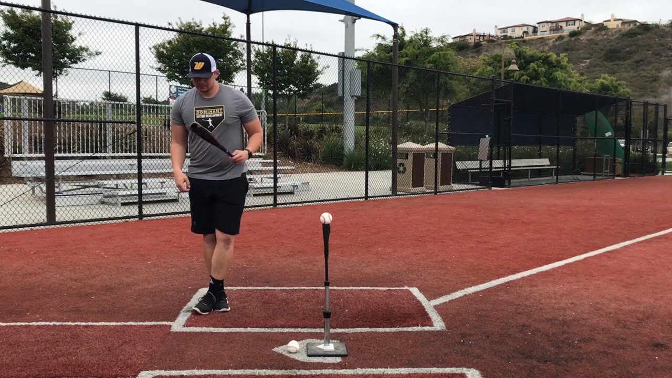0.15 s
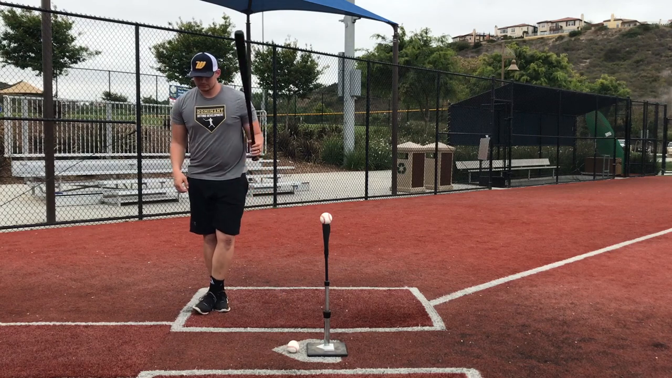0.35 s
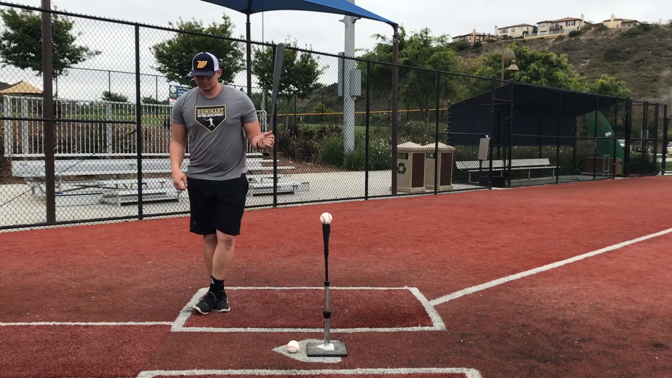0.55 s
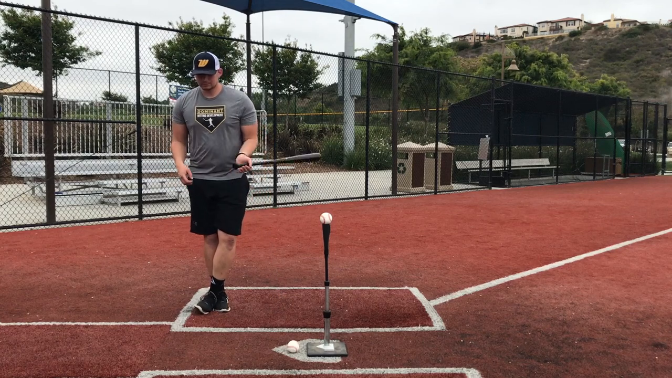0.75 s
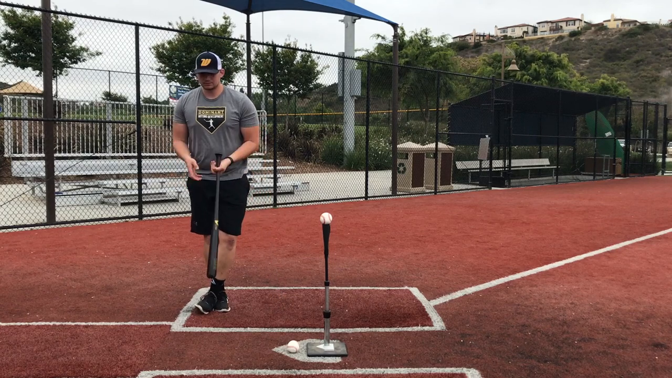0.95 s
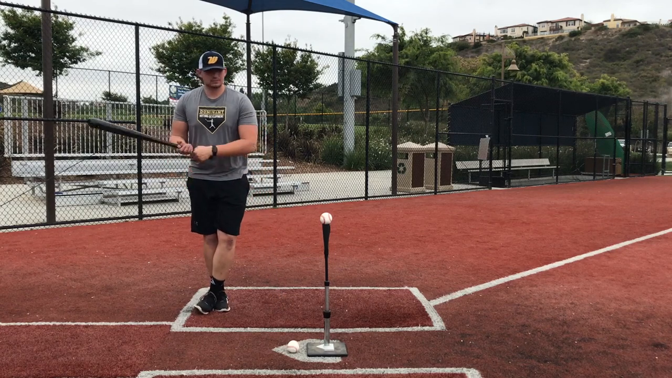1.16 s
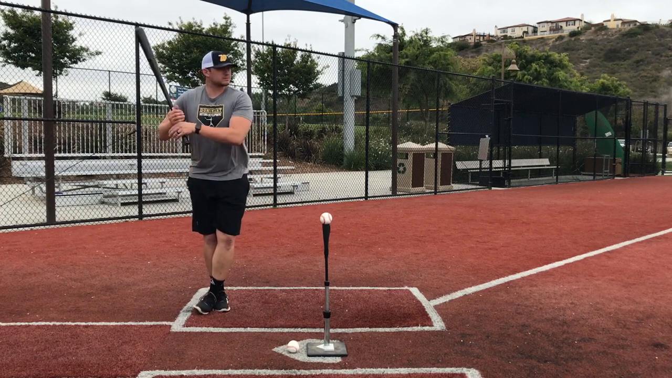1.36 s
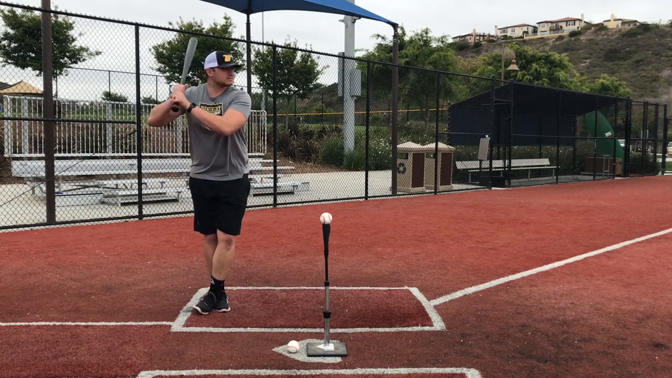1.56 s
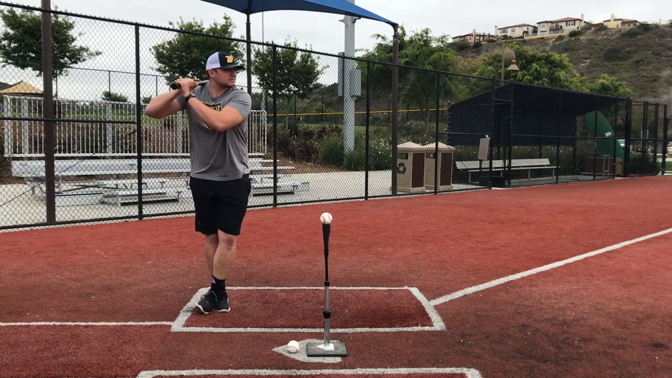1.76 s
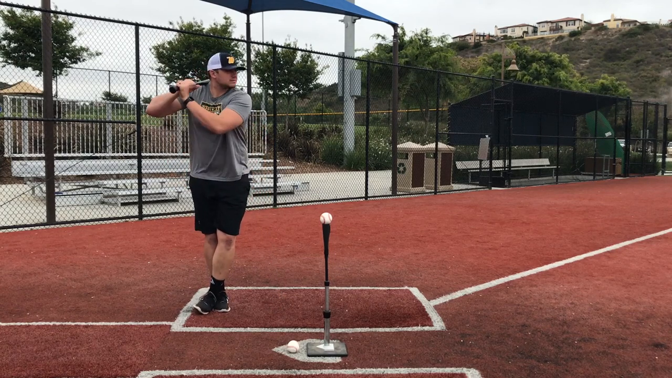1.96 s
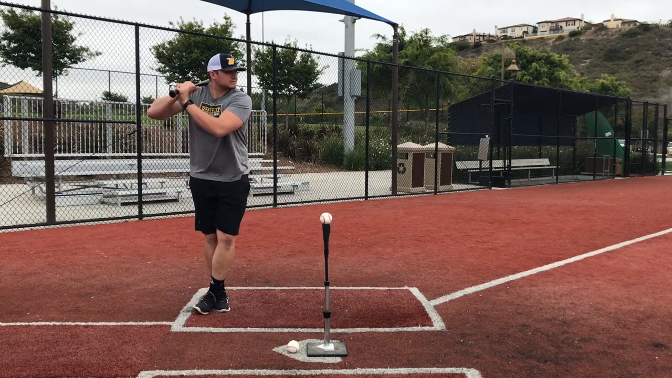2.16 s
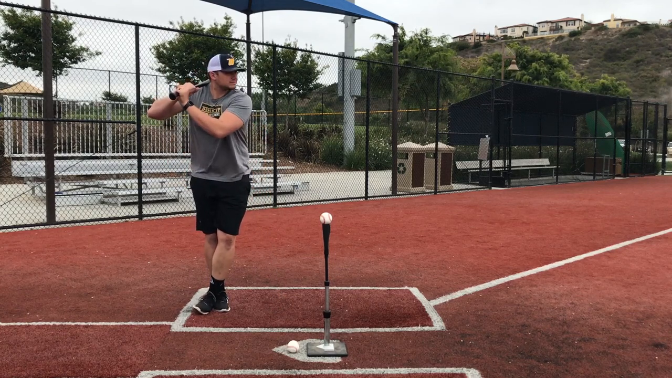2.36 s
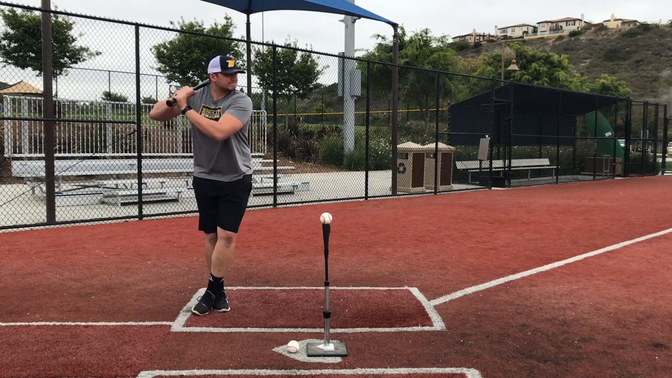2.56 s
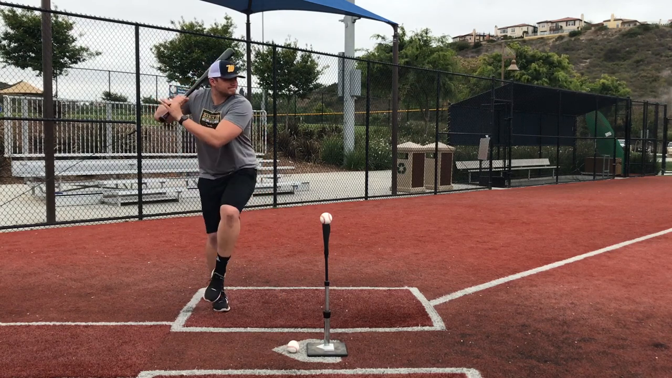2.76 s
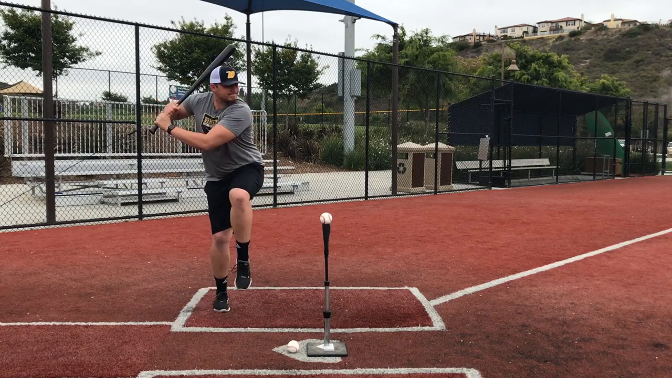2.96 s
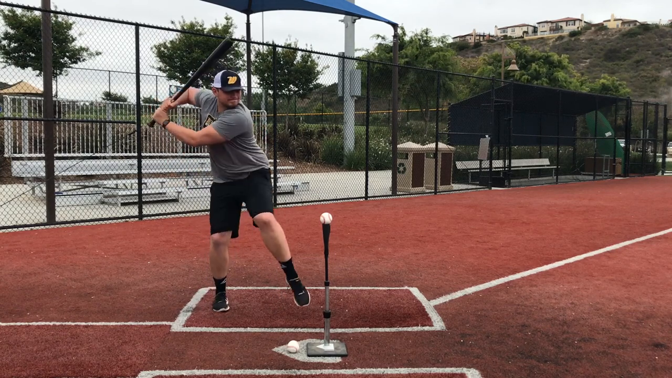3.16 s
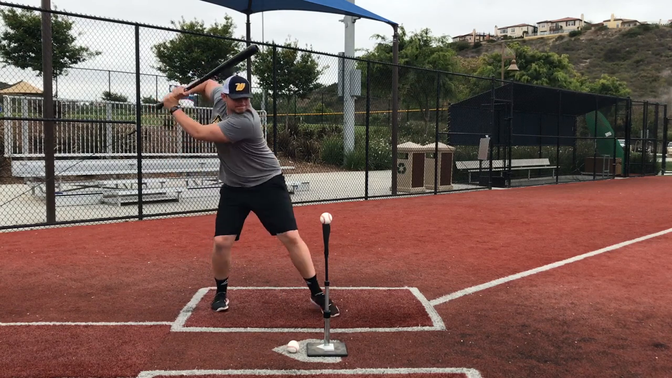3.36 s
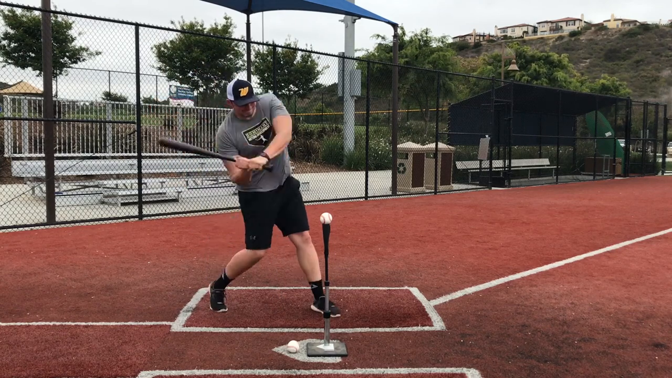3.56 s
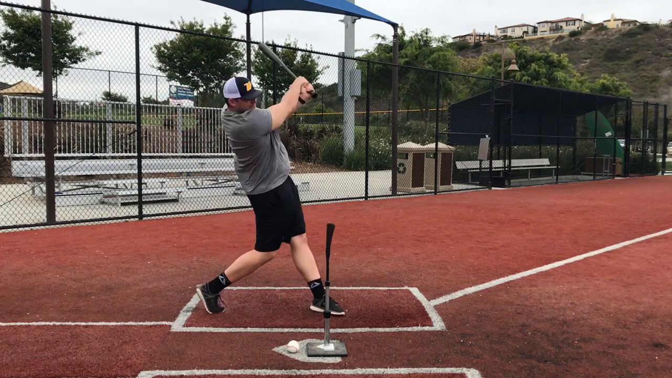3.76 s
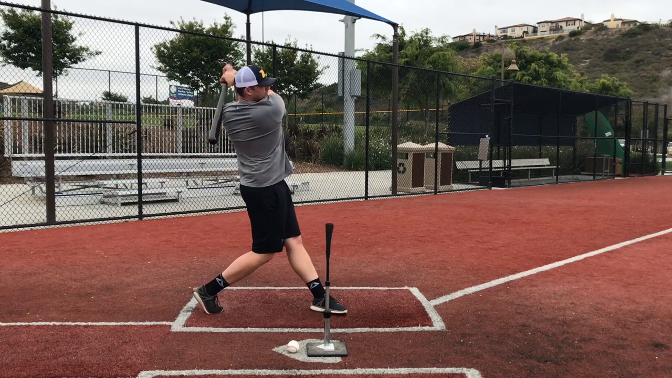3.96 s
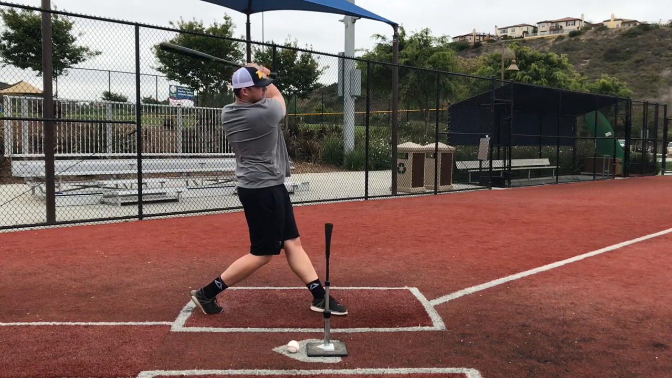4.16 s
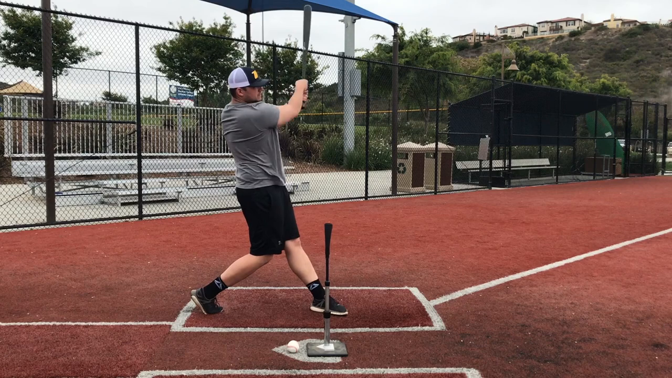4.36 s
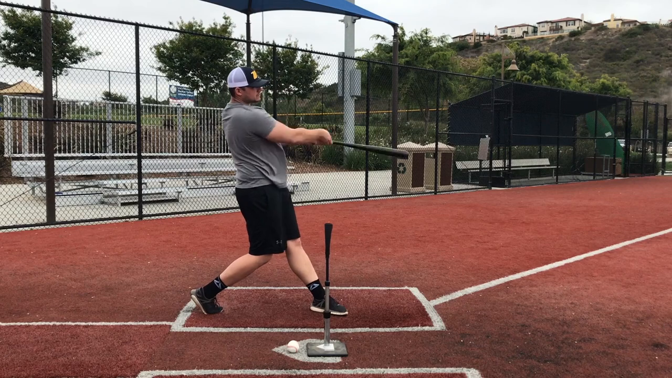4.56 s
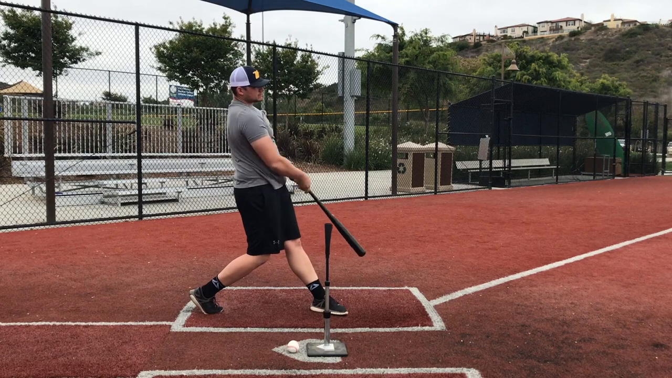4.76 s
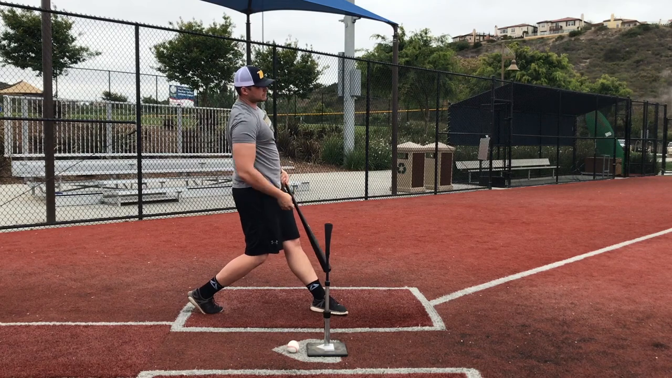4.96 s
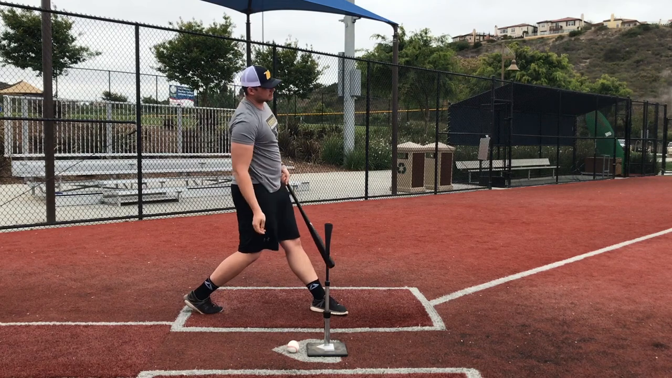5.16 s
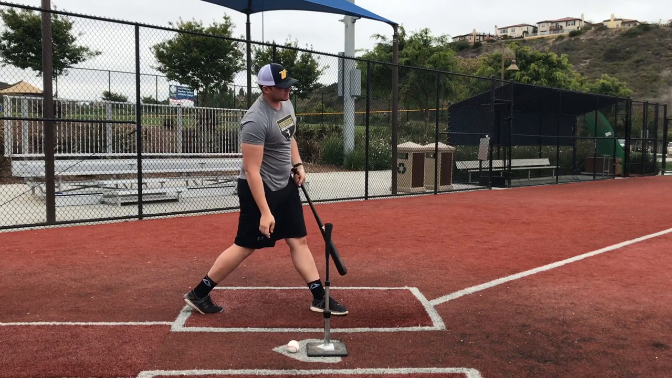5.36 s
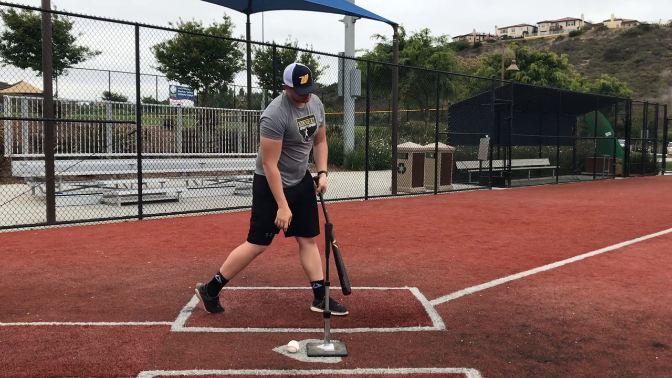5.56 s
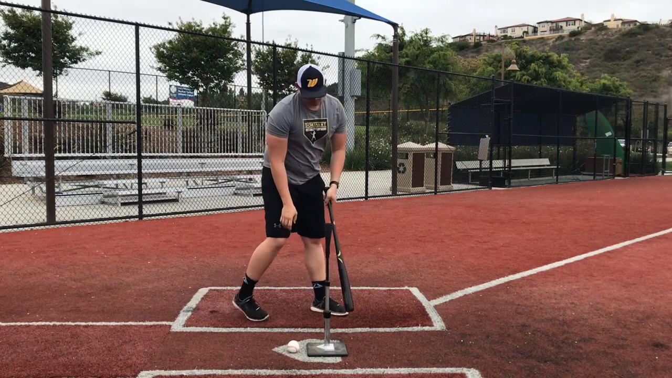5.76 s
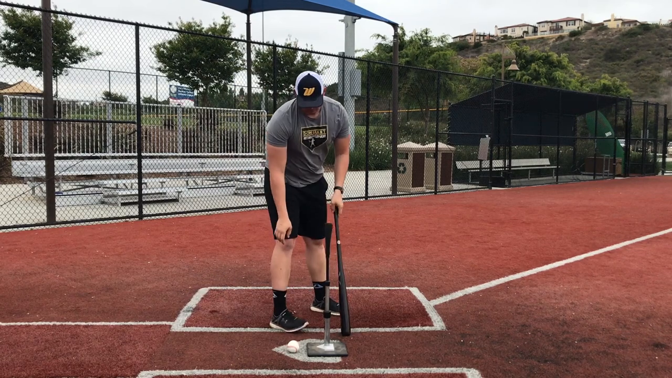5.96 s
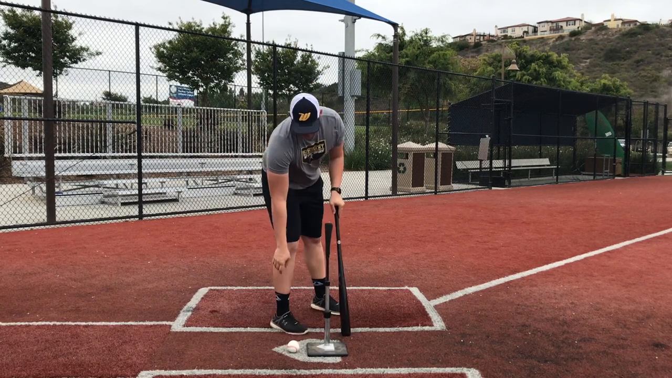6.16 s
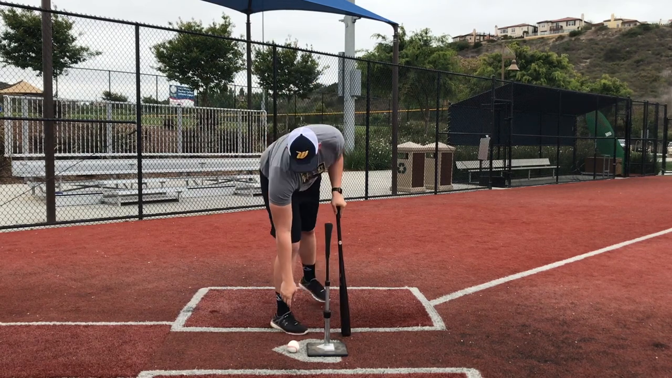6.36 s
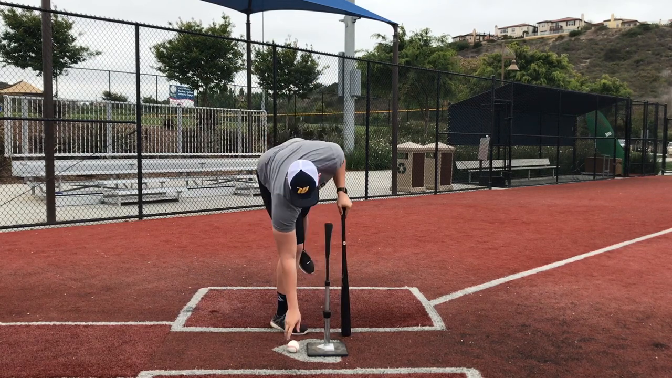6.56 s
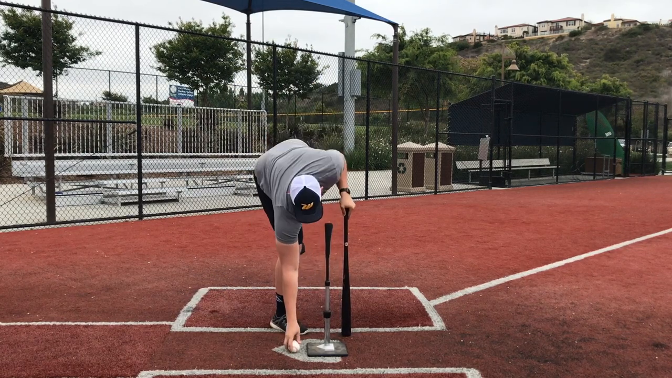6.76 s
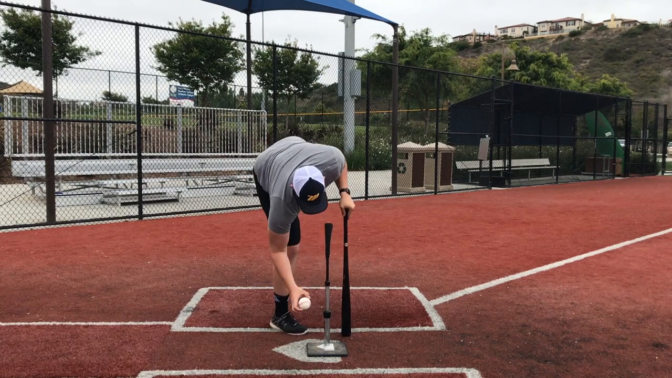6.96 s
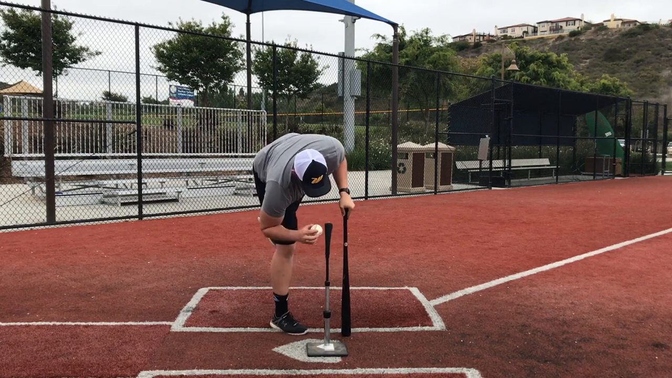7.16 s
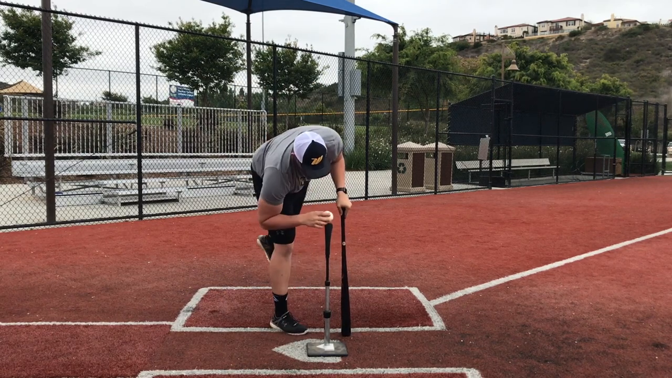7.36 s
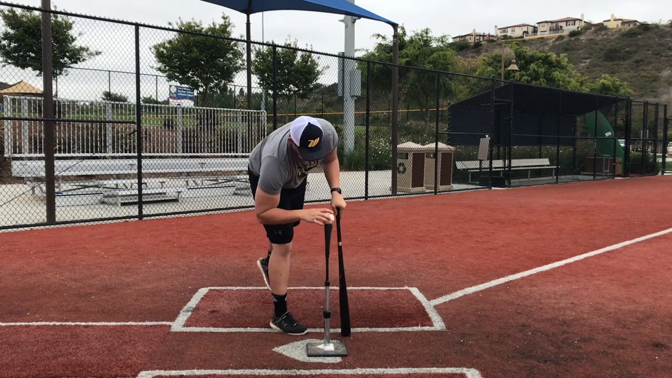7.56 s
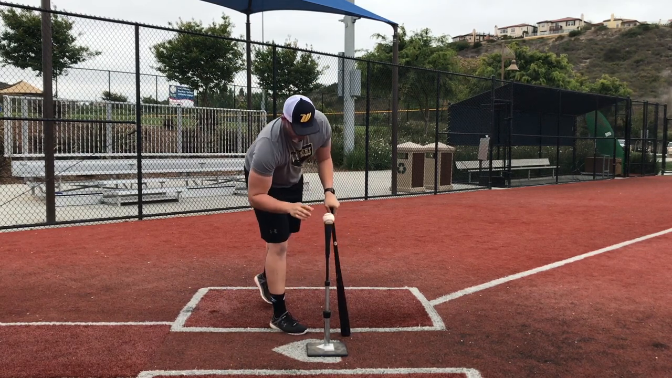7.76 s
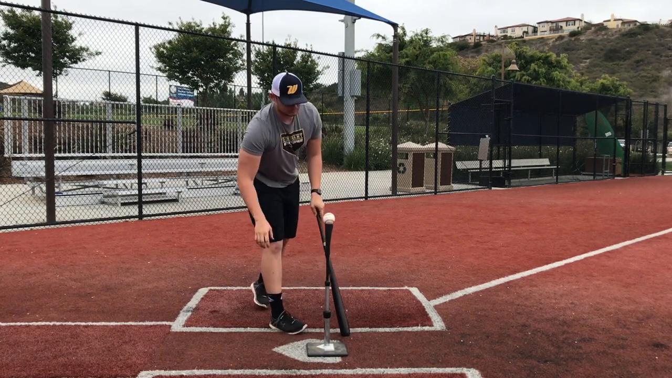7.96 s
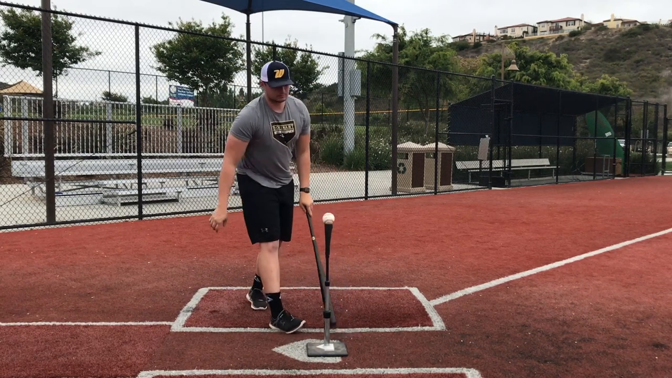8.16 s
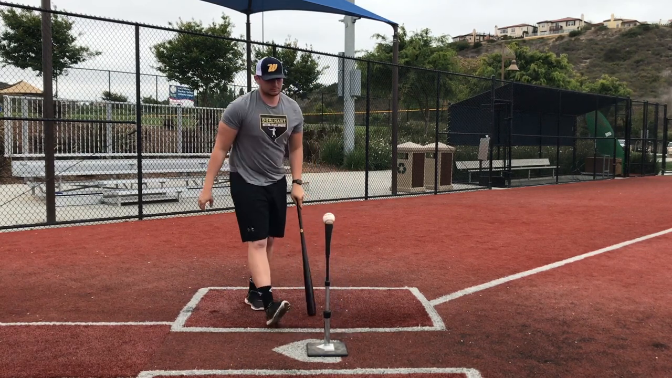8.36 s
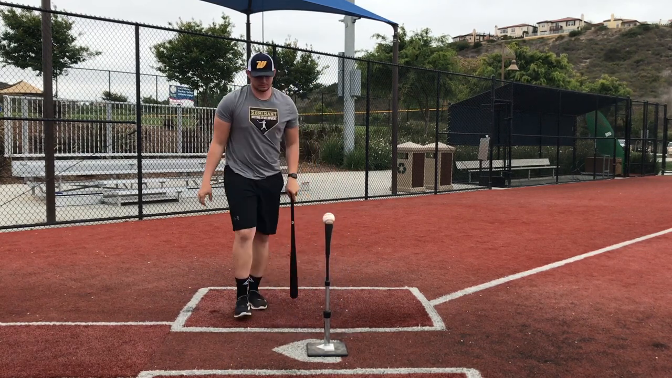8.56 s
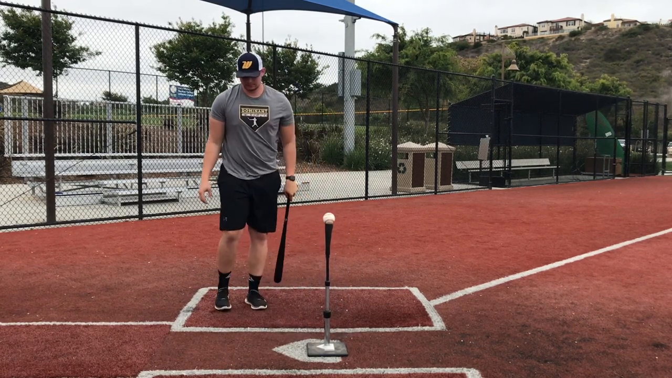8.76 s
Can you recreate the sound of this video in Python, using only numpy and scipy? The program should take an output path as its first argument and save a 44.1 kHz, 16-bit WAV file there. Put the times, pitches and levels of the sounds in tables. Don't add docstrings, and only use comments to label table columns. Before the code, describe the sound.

On an open turf field, songbirds chirp over soft distant traffic, wind and a faint motor hum. Light handling taps come first, then a quick whoosh and a very loud, dry wooden crack as a bat hits a ball off a tee. Slap echoes crackle off fences and sheds and fade. Afterwards an engine passes far off, shoes scuff and a thin chain jingles, heard by a phone a few metres away.

```python
import sys
import numpy as np
from scipy import signal
from scipy.fft import rfft, irfft
from scipy.io import wavfile
from scipy.ndimage import uniform_filter1d

SR = 44100
rng = np.random.default_rng(int(sys.argv[2]) if len(sys.argv) > 2 else 0)


def invert_db(x):
    u = np.asarray(x, float) / 20
    return 10 ** u


def dump(signal):
    limited = np.clip(np.atleast_2d(signal).T, -1, 1)
    pcm = np.round(limited * 32767).astype(np.int16)
    wavfile.write(sys.argv[1], SR, pcm)


N = 388080
T = np.arange(N) / SR
HIT_S = 3.74541


def band(x, lo_hz, hi_hz):
    return signal.sosfilt(signal.butter(2, [lo_hz, min(hi_hz, 20000)], "band", fs=SR, output="sos"), x)


def unit(x):
    return x / np.sqrt(np.mean(x ** 2))


def noise_band(lo_hz, hi_hz, count=N):
    return unit(band(rng.standard_normal(count), lo_hz, hi_hz))


def add(out, s, x):
    i = int(s * SR)
    out[i:i + len(x)] += x[:len(out) - i]


def tone(hz):
    return np.sin(2 * np.pi * np.cumsum(hz) / SR)


def ring(modes, detune=0.):
    t = T[:SR // 8]
    return sum(invert_db(db - 60 * t / t60) * np.sin(2 * np.pi * hz * (1 + detune) * t) for hz, db, t60 in modes)


def burst(middle_s, length_s, hz, db, wave=np.cos):
    t = np.arange(-length_s, length_s, 1 / SR)
    return middle_s - length_s, invert_db(db) * np.exp(-(3 * t / length_s) ** 2 / 2) * wave(2 * np.pi * hz * t)


def hump(s, rise_s, fall_s, db):
    return invert_db(db - 12 * ((T - s) / np.where(T < s, rise_s, fall_s)) ** 2)


def walk(rate_hz):
    k = int(SR / rate_hz)
    steps = np.repeat(rng.standard_normal(N // k + 1), k)
    return unit(uniform_filter1d(uniform_filter1d(steps, k), k)[:N])


def curve(table, off_db=-140):
    s, *columns = np.transpose(table)
    return [np.interp(T, s, c, off_db, off_db) for c in columns]


def log_interp(hz, table):
    table_hz, db = np.transpose(table)
    return np.interp(np.log(hz), np.log(table_hz), db)


def traffic_and_wind():
    # (frequency [Hz], density [dB per Hz])
    colour = [(12, -45.5), (20, -18), (53, -1), (96, 0), (121, -6.5), (151, -9.5), (174, -11), (382, -27),
              (452, -29.5), (1050, -26), (2180, -36.5), (2810, -38), (4930, -44), (14300, -55.5),
              (16500, -51.5)]
    # (frequency [Hz], width [Hz], level [dB])
    port = [(4950, 620, -4), (7700, 1300, -3), (10000, 480, -2), (12800, 3700, 4)]
    # (time [s], level [dB])
    swell = [(0.0, -57.5), (1.25, -56.5), (1.64, -60.5), (2.33, -56), (2.7, -58), (3.21, -56), (4.07, -60),
             (4.78, -54), (7.18, -60.5), (8.11, -54), (8.48, -62), (8.8, -60.5)]
    nearing_s = np.maximum(T - 4.7, 0)
    drone_db_s, roar_db_s = 1.17, 0.8
    moves_db = (curve(swell)[0], drone_db_s * nearing_s, roar_db_s * nearing_s)
    rumble_db, drone_db, roar_db = (c - c.mean() for c in moves_db)

    hz = np.maximum(np.fft.rfftfreq(N, 1 / SR), 1)
    colour_db = log_interp(hz, colour)
    colour_db += sum(db * np.exp(-(2 * (hz - mid_hz) / width_hz) ** 2) for mid_hz, width_hz, db in port)
    spectrum = rfft(rng.standard_normal(N)) * invert_db(colour_db)
    spectrum *= invert_db(-55) / np.std(irfft(spectrum, N))

    gusty_db = rumble_db + 1.5 * walk(8.3)
    octave_db = [gusty_db] * 3 + [(rumble_db + drone_db) / 2, drone_db]
    octave_db += [roar_db] * 3 + [.5 * roar_db, 0, 0]
    out = np.zeros(N)
    for octave, swell_db in enumerate(octave_db, 4):
        share = np.cos(np.pi / 2 * np.clip(np.log2(hz) - octave, -1, 1)) ** 2
        out += invert_db(swell_db + .5 * walk(5.5)) * irfft(spectrum * share, N)
    return out


def motors():
    # (loudest [s], rise [s], fall [s], frequency [Hz], level [dB])
    hum = [(1.7, 1.3, 2.8, 148.5, -62)]
    # (loudest [s], rise [s], fall [s], frequency [Hz], level [dB])
    engine = [
        (4.6, 0.77, 0.14, 93, -54),
        (4.85, 0.14, 0.52, 115, -55),
        (5.9, 0.82, 0.4, 110, -64.5),
        (8.08, 0.3, 0.31, 100, -57),
        (8.8, 0.27, .3, 106, -65),
    ]
    out = np.zeros(N)
    for table, wobble, climb_hz_s in ((hum, .002, 0), (engine, .015, 5)):
        load, drift = invert_db(1.2 * walk(4.8)), 1 + wobble * walk(9.5)
        for s, rise_s, fall_s, hz, db in table:
            out += np.sqrt(2) * load * hump(s, rise_s, fall_s, db) * tone((hz + climb_hz_s * (T - s)) * drift)
    return out


def whine():
    # (middle [s], half length [s])
    gaps = [(1.02, .04), (2.3, .03), (7.46, .05)]
    mid_hz, width_hz = 10700, 320
    hiss = noise_band(mid_hz - width_hz / 2, mid_hz + width_hz / 2)
    hiss *= np.prod([np.abs(T - s) > half_s for s, half_s in gaps], axis=0)
    return invert_db(-95.5 + 1.5 * walk(3)) * hiss


def converter_hiss():
    coarse = (T > HIT_S) & (T < 4.157)
    return coarse * invert_db(-70.5) * noise_band(500, 15500)


def notes():
    # (start [s], length [s], from [Hz], to [Hz], level [dB])
    slurs = [(.414, .018, 3530, 3240, -79), (1.857, 0.0128, 4040, 3360, -76),
             (2.26, 0.017, 3960, 3210, -69.5), (2.592, .058, 4300, 3662, -83),
             (2.722, .018, 5900, 5100, -79), (2.921, 0.015, 5300, 4250, -84),
             (3.128, 0.016, 4350, 3800, -78), (3.15, .008, 4300, 3520, -78),
             (3.155, 0.017, 3390, 2730, -69), (3.17, 0.0127, 2935, 2550, -76),
             (3.238, .006, 3500, 2600, -73), (3.523, .008, 3250, 2620, -72),
             (3.576, 0.0112, 3300, 2850, -65), (3.532, 0.047, 2600, 3240, -64),
             (6.328, 0.027, 6120, 5100, -75.5), (7.308, .075, 3330, 3060, -80),
             (7.803, 0.029, 3790, 3280, -80.5)]
    # (start [s], length [s], from [Hz], to [Hz], level [dB])
    rises = [(1.11, .014, 3300, 4760, -79), (1.112, .008, 2050, 2400, -77), (1.262, 0.16, 3850, 4220, -79),
             (2.871, 0.0076, 3300, 3800, -77), (2.049, 0.046, 3870, 4050, -77.5),
             (2.242, 0.017, 3300, 3600, -77), (2.835, .015, 3200, 4040, -78),
             (3.089, 0.02, 3020, 3290, -71), (5.142, .055, 4150, 4750, -83),
             (5.365, 0.055, 3650, 4700, -80), (8.329, .016, 3700, 4000, -81),
             (8.351, .014, 3200, 3450, -79), (7.223, 0.037, 5240, 5530, -80)]
    # (start [s], length [s], from [Hz], to [Hz], level [dB])
    droops = [(.584, .036, 3020, 2860, -81), (2.608, 0.062, 4066, 3770, -78), (3.3, .022, 3030, 2790, -87),
              (3.404, 0.058, 2870, 2230, -68), (4.477, .065, 3482, 3250, -80),
              (7.242, 0.034, 5580, 5030, -77), (8.3, 0.027, 4320, 3880, -77),
              (3.263, .054, 3200, 2120, -67)]
    # (start [s], length [s], from [Hz], to [Hz], level [dB])
    falls = [(8.615, .026, 3500, 2350, -78), (1.392, 0.0164, 3650, 3100, -82),
             (5.655, .05, 4820, 4600, -89), (2.5, .016, 3560, 3050, -85), (2.852, .02, 4150, 3050, -71),
             (3.587, 0.045, 2850, 2170, -67.5), (7.497, .01, 3270, 3100, -77),
             (7.704, .016, 3200, 2750, -76)]
    # (start [s], length [s], from [Hz], to [Hz], level [dB], glide done at mid note [1])
    swells = [(2.43, 0.057, 5210, 4300, -83, 0.57), (2.723, 0.055, 5170, 4170, -76, .7),
              (2.941, 0.052, 4230, 3000, -73.5, 0.43)]
    # (start [s], length [s], frequency [Hz], level [dB])
    holds = [(.375, .045, 3900, -85), (0.508, 0.034, 3300, -77), (2.739, .042, 3480, -82.5),
             (1.119, .013, 2400, -68), (1.43, .14, 4140, -91), (5.38, .05, 5500, -89),
             (2.877, 0.018, 3800, -71.5), (7.175, .04, 3290, -82.5), (3.593, 0.032, 3200, -83),
             (3.94, .052, 2620, -69), (3.955, .04, 3250, -73), (4.436, 0.029, 3480, -82),
             (5.245, 0.038, 4780, -85), (5.468, .028, 4760, -84.5), (6.76, .085, 4790, -85),
             (6.855, 0.115, 4750, -84.5), (6.975, 0.105, 4790, -84.5), (7.085, .07, 4760, -90),
             (7.1, .037, 3700, -78), (7.171, .03, 3680, -79.5)]
    # (start [s], arch level [dB], drop level [dB])
    motifs = [(7.224, -84, -77), (7.42, -75, -76), (7.626, -75, -73.5)]
    # (length [s], from [Hz], top [Hz], to [Hz])
    arch = (0.052, 3450, 4300, 2800)
    # (delay [s], length [s], from [Hz], to [Hz])
    drops = [(0.067, 0.00966, 4150, 3200), (0.073, 0.014, 4170, 3370)]
    # (start [s], end [s], three pitches [Hz], level [dB], growth [dB])
    far_arch = (1.625, 1.675, 3300, 3900, 3400, -84, 0)

    def glide(s, length_s, a_hz, b_hz, db, share, growth_db=0):
        return s, s + length_s, a_hz, a_hz + share * (b_hz - a_hz), b_hz, db, growth_db

    slur_share = .67
    rows = []
    for table, share in ((slurs, slur_share), (rises, .6), (droops, .33), (falls, .44)):
        rows += [glide(*row, share) for row in table]
    rows += [glide(*row, 16) for row in swells]
    rows += [glide(s, length_s, hz, hz, db, 0) for s, length_s, hz, db in holds]
    for s, arch_db, drop_db in motifs:
        rows += [(s, s + arch[0], *arch[1:], arch_db, 0)]
        rows += [glide(s + lag_s, length_s, a, b, drop_db, slur_share) for lag_s, length_s, a, b in drops]
    return rows + [far_arch]


def nasal_call():
    # (time [s], pitch [Hz], level [dB])
    call = [(1.128, 2370, -81), (1.135, 2290, -63), (1.146, 1570, -62), (1.165, 1475, -65),
            (1.197, 1238, -71), (1.25, 1125, -69), (1.345, 1054, -71), (1.39, 935, -73), (1.407, 836, -78)]
    # (frequency [Hz], level [dB])
    throat = [(900, -28), (1500, -15), (2050, -9), (2400, -5), (3200, 1), (4300, 0), (4800, -3),
              (5500, -11), (7000, -23), (9000, -33)]
    # (time [s], loss per overtone above the third [dB])
    beak = [(1.15, 12), (1.175, 4), (1.225, 1), (1.27, 12)]
    span = slice(SR, 2 * SR)
    hz, db = (c[span] for c in curve(call))
    dull_db = np.interp(T[span], *np.transpose(beak))
    hz = np.maximum(hz, 1)
    out = np.zeros(N)
    for k in range(1, 7):
        open_beak_db = 3 * (k == 1)
        partial_db = db + log_interp(k * hz, throat) + open_beak_db - np.abs(dull_db) * max(k - 3, 0)
        out[span] += invert_db(partial_db) * tone(k * hz)
    return out


def birds():
    # (start [s], end [s], pulse rate [Hz])
    trill = (2.58, 2.68, 110)
    out = np.zeros(N)
    for start, end, hz0, hz1, hz2, db, growth_db in notes():
        length_s = end - start
        u = np.linspace(-.12, 1.12, int(1.24 * length_s * SR))
        hz = hz0 * (1 - u) * (1 - 2 * u) + 4 * hz1 * u * (1 - u) + hz2 * u * (2 * u - 1)
        swell = np.sqrt(2) * np.hanning(len(u)) ** .4 * invert_db(db + growth_db * (u - .5))
        add(out, start - .12 * length_s, swell * tone(hz))
    out *= invert_db(1.4 * walk(120))
    pulsed = (T > trill[0]) & (T < trill[1])
    out *= 1 + pulsed * np.sin(2 * np.pi * trill[2] * T)
    out += nasal_call() * invert_db(.6 * walk(60))
    leaves = rng.standard_normal(SR // 10) * invert_db(-350 * T[:SR // 10])
    return out + invert_db(-34) * signal.fftconvolve(out, leaves)[:N]


def scuffs():
    # (loudest [s], rise [s], fall [s], level [dB], brightness [dB])
    slips = [(3.58, .09, .06, -88, 8), (.56, .1, .1, -85, -10), (4.764, 0.09, 0.064, -74, -5.5),
             (4.865, 0.016, 0.022, -75, -6), (5.77, 0.037, .02, -74, -1), (5.94, .035, 0.051, -70, -0.5),
             (6.02, 0.047, 0.052, -65, -2.5), (6.105, .02, 0.054, -76, -3.5), (8.45, 0.049, 0.06, -75.5, 0),
             (8.52, .04, .07, -77, 3), (8.635, 0.0275, 0.06, -77.5, -15)]
    grit = rng.standard_normal(N) * invert_db(1.5 * walk(300) - walk(45.4))
    low, high = unit(band(grit, 1200, 6400)), unit(band(grit, 4700, 14300))
    return sum(hump(s, rise_s, fall_s, db) * (low + invert_db(bright_db) * high)
               for s, rise_s, fall_s, db, bright_db in slips)


def taps():
    # (time [s], level [dB], frequency [Hz], t60 [s])
    knocks = [(.9577, -53, 8700, 0.004), (.9578, -66, 3800, .006), (.959, -59, 1470, .05),
              (.959, -63, 2114, 0.059), (.9595, -65, 5500, .012), (3.676, -48.5, 3170, 0.0047),
              (3.6762, -56.5, 6000, 0.0018), (3.7215, -45, 7050, .002), (3.7215, -42, 2800, 0.0026),
              (3.928, -68, 8700, .04), (3.959, -61, 8500, .03), (3.6762, -60, 11000, .003),
              (3.608, -70, 9800, .02), (4.52, -64, 4100, .01), (4.24, -65, 3400, 0.014),
              (4.855, -62, 4100, .01), (4.855, -69, 6200, .008), (5.308, -75.5, 6650, .04),
              (5.675, -73, 5200, .01), (5.107, -57.5, 300, .03), (5.09, -73, 6270, .03),
              (5.316, -74, 6400, 0.03), (7.09, -68.5, 6000, 0.0092), (8.641, -63, 2800, .007),
              (8.627, -62, 3200, .016), (8.634, -63, 2550, .014), (8.654, -66, 2900, .01),
              (8.624, -74, 6200, .015), (8.634, -74, 5900, .012), (8.785, -66, 4200, .012)]
    out = np.zeros(N)
    for s, db, hz, t60_s in knocks:
        add(out, s, ring([(hz, db, t60_s)]))
    return out


def chain():
    # (time [s], level [dB])
    jingles = [(5.765, -71.5), (6.087, -60), (6.137, -71.5), (8.415, -75), (8.434, -71), (8.44, -70),
               (8.446, -63), (8.452, -69), (8.457, -67), (8.462, -63), (8.47, -68), (8.476, -70),
               (8.483, -69), (8.492, -71), (8.504, -73), (8.53, -74), (8.567, -75)]
    # (frequency [Hz], level [dB], t60 [s])
    link_modes = [(6800, -4, .02), (11520, 0, .02), (12800, -5, .012), (15400, -10, .015)]
    out = np.zeros(N)
    scrape = noise_band(6000, 15500)
    for s, db in jingles:
        detune, *favour = rng.standard_normal(len(link_modes) + 1)
        modes = [(hz, own_db + 4 * f, t60_s) for (hz, own_db, t60_s), f in zip(link_modes, favour)]
        link = ring(modes, 0.012 * detune)
        clink = invert_db(-21 - 60 * T[:len(link)] / .02) * scrape[int(s * SR):][:len(link)]
        add(out, s, invert_db(db) * (link + clink))
    return out


def thuds():
    # (middle [s], length [s], frequency [Hz], peak [dB])
    pushes = [(.35, 0.07, 455, -70.5), (2.89, 0.054, 466, -68), (3.699, 0.017, 97, -44),
              (4.664, 0.026, 320, -54.5), (4.674, 0.03, 847, -65), (4.665, 0.031, 470, -64.5),
              (6.45, 0.068, 69.9, -47.5), (6.676, 0.09, 60, -45.5), (7.022, 0.014, 90.2, -49),
              (7.289, 0.047, 68.7, -35), (7.28, 0.013, 123, -42), (7.324, .04, 66, -40.5),
              (8.435, 0.066, 65.3, -46.5)]
    # (middle [s], length [s], frequency [Hz], peak [dB])
    air_push = (3.7378, .032, 79, -26.5)
    out = np.zeros(N)
    add(out, *burst(*air_push, np.sin))
    for row in pushes:
        add(out, *burst(*row))
    return out


def swing():
    # (low edge [Hz], high edge [Hz], level at the tee [dB], rise [dB/s], jump at the tee [dB])
    whoosh = [(300, 850, -58, 260, 9.5), (850, 2500, -68, 200, 11), (2500, 14000, -67, 179, 8.5)]
    graze_s = 3.7215
    out = np.zeros(N)
    for lo_hz, hi_hz, db, rise_db_s, jump_db in whoosh:
        gain_db = db + np.where(T < graze_s, rise_db_s * (T - graze_s), jump_db)
        out += (T < HIT_S) * invert_db(np.minimum(gain_db, 60)) * noise_band(lo_hz, hi_hz)
    return out


def panels():
    # (middle [s], length [s], frequency [Hz], peak [dB])
    answers = [(3.7506, .005, 2000, -31), (3.751, .003, 3300, -27), (3.7748, .0018, 3048, -26),
               (3.7802, .0019, 3150, -20), (3.7808, 0.0019, 1780, -18), (3.7811, .0016, 4000, -29),
               (3.7822, .0035, 930, -30), (3.7806, 0.0019, 2452, -27)]
    out = np.zeros(N)
    for row in answers:
        add(out, *burst(*row))
    return out


def scatter():
    # (band middle [Hz], early level [dB], early t60 [s], late level [dB], late t60 [s])
    bands = [(252, -42, .1, -71.5, .4), (600, -50, 0.37, -64, 0.82), (1200, -44, 0.36, -60, 1),
             (2000, -48, 0.11, -54.5, 1), (3103, -50.5, 0.35, -53.5, .8), (6000, -53, 0.33, -65.5, 0.77),
             (10980, -54, 0.23, -68, .5)]
    out, after = np.zeros(N), T[:SR]
    grain = invert_db(1.8 * walk(400)[:SR]) * (1 - np.exp(-after / .012))
    patches = invert_db(2.5 * walk(130))[:len(bands) * SR].reshape(-1, SR)
    for patch, (hz, early_db, early_s, late_db, late_s) in zip(patches, bands):
        fade = invert_db(early_db - 60 * after / early_s) + invert_db(late_db - 60 * after / late_s)
        add(out, HIT_S, fade * grain * patch * noise_band(hz * 0.66, min(hz * 1.5, 15500), SR))
    return out


def slap_echoes(blow):
    # (time [s], level [dB], low edge [Hz], high edge [Hz])
    slaps = [(3.7483, -8, 2500, 4500), (3.7509, -7, 2536, 5000), (3.75, -13, 7000, 15580),
             (3.751, -17, 9000, 15580), (3.761, -27, 2000, 9000), (3.7666, -21, 800, 3014),
             (3.7731, -4, 6000, 7800), (3.773, 0, 950, 2300), (3.786, -21, 2700, 3700),
             (3.7795, -10, 4500, 13000), (3.7795, -12, 1200, 4600), (3.7851, -16, 803, 2978),
             (3.788, -22.5, 1000, 4536), (3.8088, -18, 3500, 9500), (3.8089, -30, 9500, 15500),
             (3.809, -13, 800, 2500), (3.814, -14, 1300, 2300), (3.817, -22, 900, 3000),
             (3.839, -20.5, 2800, 3700), (3.908, -28, 2900, 3700), (3.953, -27, 1400, 3700),
             (3.991, -30, 2300, 3200), (4.269, -35.5, 3057, 7000), (4.27, -24, 1200, 2976),
             (4.2723, -48, 2000, 5430), (4.3082, -32, 1200, 3440),
             (3.747, -11, 5000, 15500), (3.75, -10, 6000, 15500), (3.7542, -25, 10000, 15000),
               (3.7655, -23, 9000, 15700), (3.7675, -24, 9000, 15700), (3.7695, -22, 7500, 14500),
               (3.773, -21, 9010, 14050), (3.785, -23, 4500, 15470), (3.805, -28.5, 7000, 14900),
               (3.8135, -27, 9000, 15500), (3.8172, -33, 7000, 15060), (3.833, -22, 1300, 2100),
               (3.8325, -36, 9000, 15500), (3.8395, -30, 5500, 8500), (3.852, -28, 4500, 8500),
               (3.856, -24, 1310, 2100), (3.868, -33, 800, 1400), (3.872, -26, 2800, 3800),
               (3.8776, -35, 4500, 15000), (3.8805, -24.5, 8000, 12500), (3.8855, -27, 4300, 5800),
               (3.8857, -28, 8000, 10500), (3.8905, -33, 4000, 9000), (3.92, -32, 1500, 2800),
               (3.93, -35, 990, 1820), (3.964, -32, 1200, 1900), (4.036, -38, 1100, 2500),
               (4.075, -41, 700, 1490)]
    out, t = np.zeros(N), T[:SR // 40]
    for s, db, lo_hz, hi_hz in slaps:
        t60_s = .017 * (1e3 / lo_hz) ** .4
        rough, hiss = rng.standard_normal((2, len(t)))
        mesh = invert_db(-60 * t / t60_s) * (1 + .3 * rough) * blow[:len(t)]
        spread = invert_db(-27 - 60 * t / .02) * (1 - np.exp(-t / .00071)) * hiss
        add(out, s, band(band(invert_db(db) * (mesh + spread), lo_hz, hi_hz), lo_hz, hi_hz))
    return out


def crack():
    # (frequency [Hz], level [dB], t60 [s], sign of the mode shape toward the listener [1])
    bat = [(625, -13.3, 0.036, -1), (800, -12.8, 0.014, 1), (1090, -22.1, 0.0456, 1),
           (1410, -15.0, 0.0151, -1), (1760, -28.7, 0.0424, -1), (2020, -29.1, 0.0341, 1),
           (2640, -28.5, 0.0288, -1), (3280, -23.3, 0.028, 1), (3440, -22.5, 0.0191, 1),
           (3760, -24.7, 0.0101, 1), (4470, -16.0, 0.0034, -1), (5260, -28.7, 0.027, -1),
           (6730, -17.1, 0.0022, 1), (9070, -18.6, 0.0022, -1), (11750, -17.0, 0.0028, 1),
           (13440, -18.6, 0.0031, -1)]
    # (frequency [Hz], level [dB], t60 [s])
    barrel = [(494, -22.5, .026)]
    # (middle [s], length [s], frequency [Hz], peak [dB])
    snap = (3.7456, .00012, -11000, -8.5)
    # (frequency [Hz], level [dB], t60 [s])
    contact = [(200.8, -30.5, .04), (274, -33, 0.039), (2260, -23, 0.015), (5900, -20.5, 0.0055),
               (8196, -30, 0.002), (13200, -17, .002), (16000, -27, .002)]
    # (level [dB], t60 [s])
    leather = (-27, 0.016)
    # (lag [s], gain [1])
    bounces = [
        (.00209, -.44),
        (.00448, -.24),
    ]
    mode_rings = [sign * ring([(hz, db, t60_s)]) for hz, db, t60_s, sign in bat]
    blow, body = sum(mode_rings), sum(mode_rings[:12])
    out = np.zeros(N)
    add(out, HIT_S, body + ring(barrel))
    add(out, *burst(*snap, np.sin))
    add(out, HIT_S + .00017, -ring(contact))
    add(out, HIT_S, invert_db(leather[0] - 60 * T[:2000] / leather[1]) * noise_band(4200, 7500, 2000))
    soft = uniform_filter1d(blow, size=4)
    for lag_s, gain in bounces:
        add(out, HIT_S + lag_s, gain * soft)
    return out + slap_echoes(blow) + scatter()


def low_pass(x, order, stop_db, top_hz):
    return signal.sosfilt(signal.ellip(order, .2, stop_db, top_hz, fs=SR, output="sos"), x)


def scene():
    steady = traffic_and_wind() + motors() + whine() + converter_hiss()
    steady += birds() + scuffs() + taps() + chain() + thuds() + swing() + panels()
    hit, bright_s = crack(), .007
    first = np.clip(2 - (T - HIT_S) / bright_s * 2, 0, 1)
    blow = low_pass(first * hit, 10, 70, 16950)
    return (blow + low_pass(steady + (1 - first) * hit, 8, 60, 15750))[None]


def top_cut(x):
    return signal.sosfilt(signal.butter(12, 17110, fs=SR, output="sos"), x)


def record(dry):
    return top_cut(dry)


dry = scene()
out = record(dry)
dump(out)
```